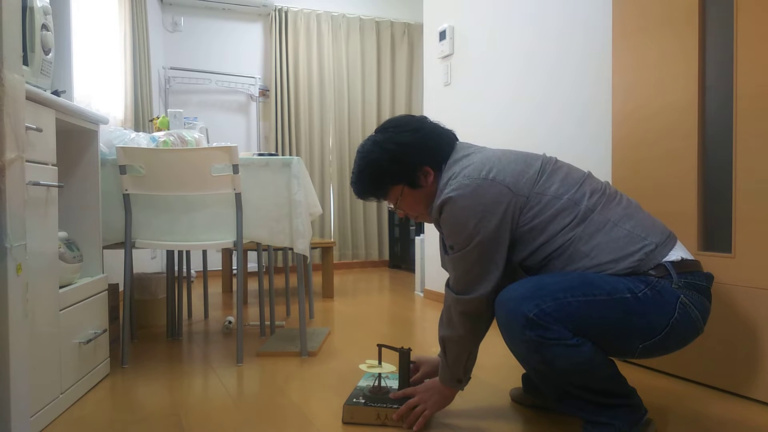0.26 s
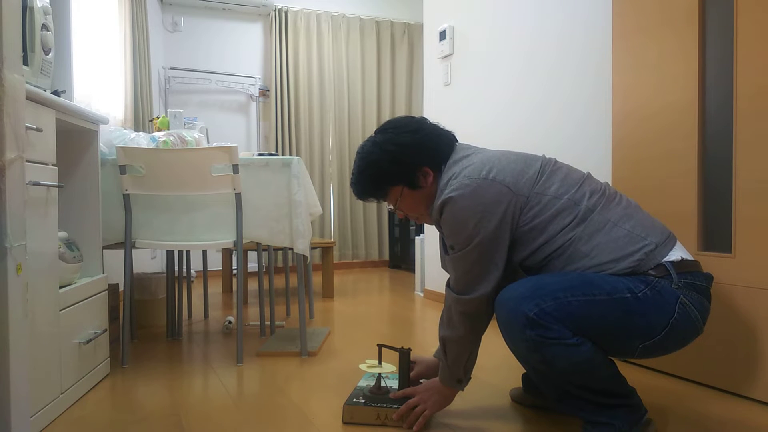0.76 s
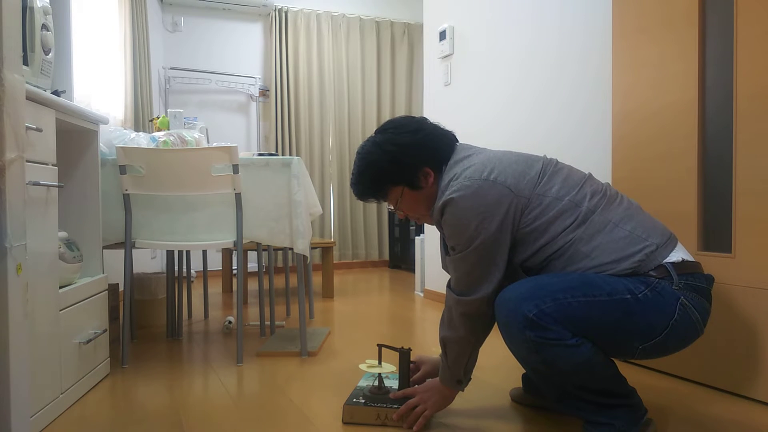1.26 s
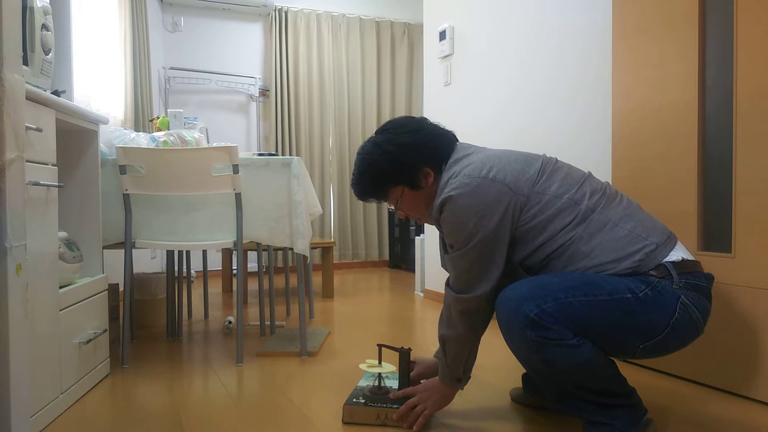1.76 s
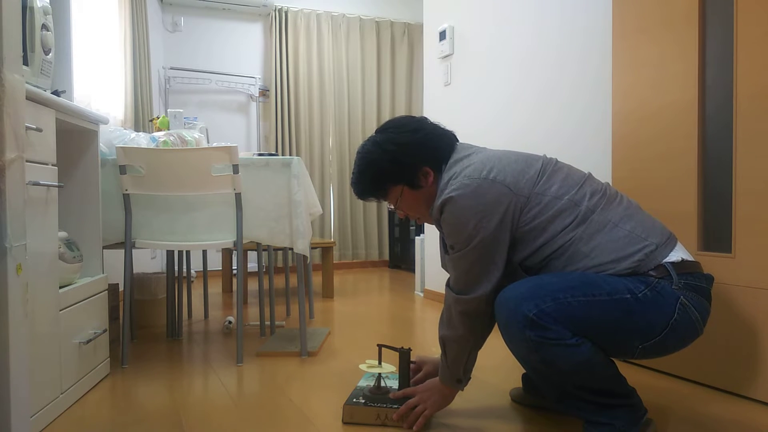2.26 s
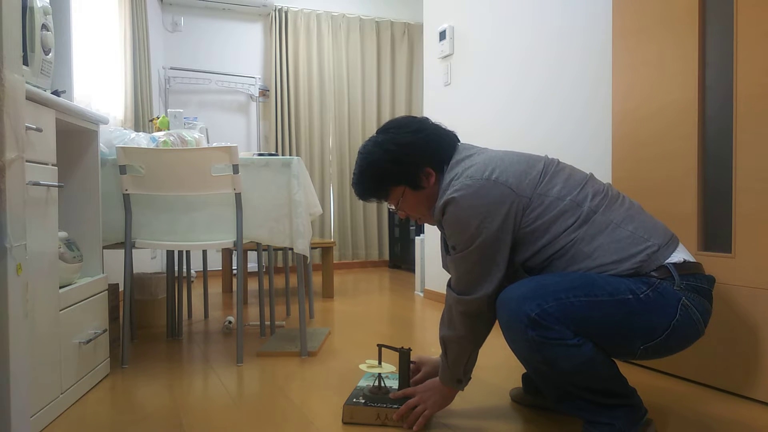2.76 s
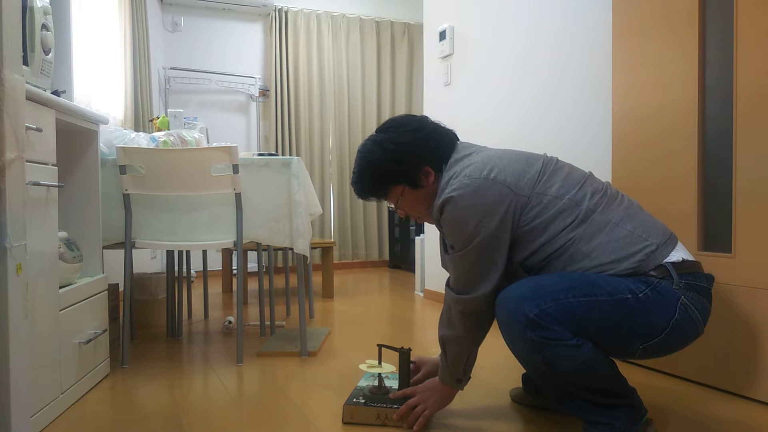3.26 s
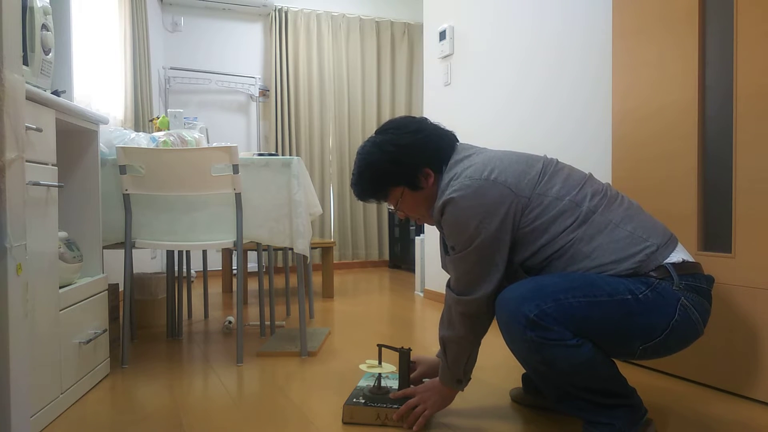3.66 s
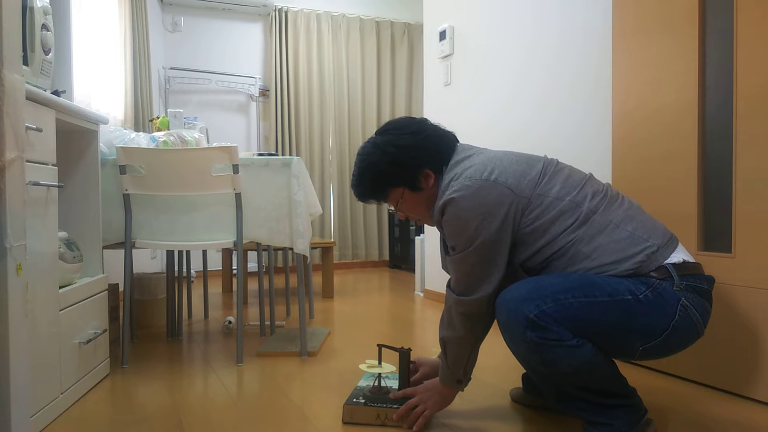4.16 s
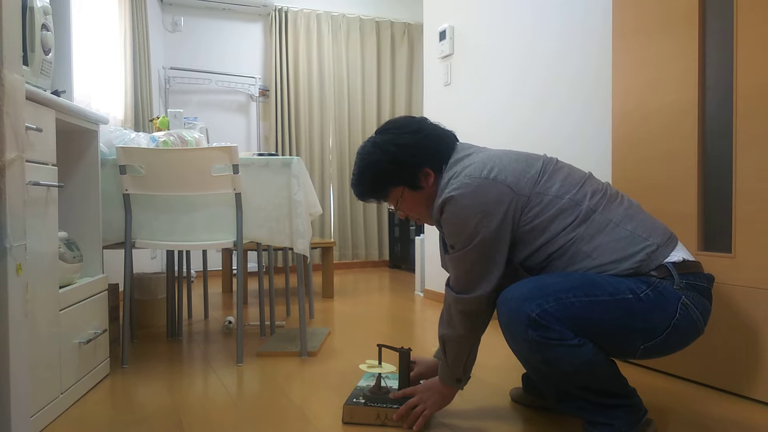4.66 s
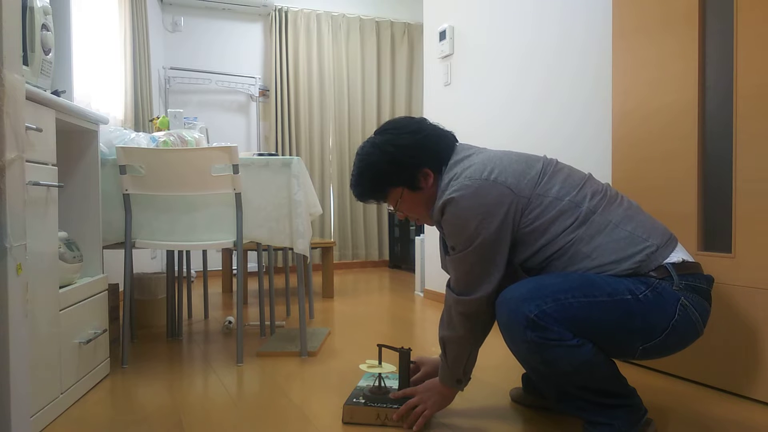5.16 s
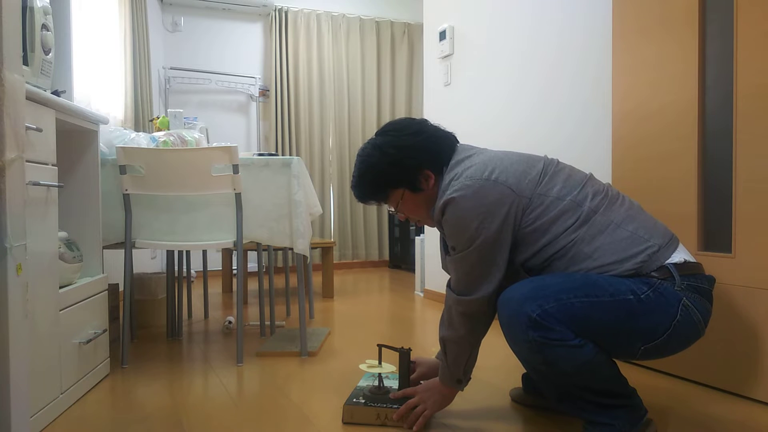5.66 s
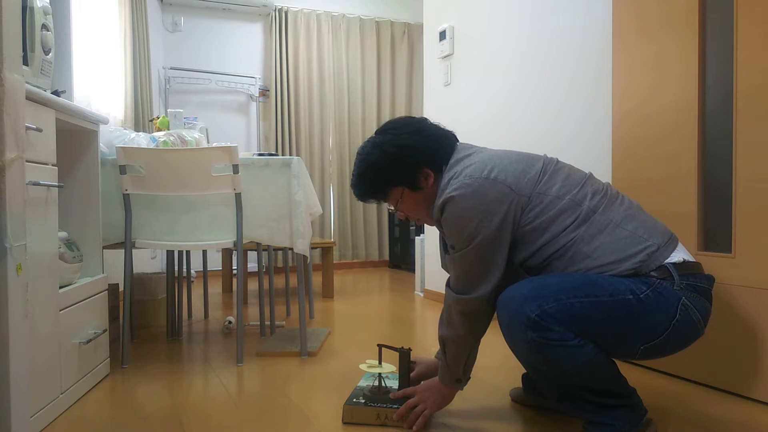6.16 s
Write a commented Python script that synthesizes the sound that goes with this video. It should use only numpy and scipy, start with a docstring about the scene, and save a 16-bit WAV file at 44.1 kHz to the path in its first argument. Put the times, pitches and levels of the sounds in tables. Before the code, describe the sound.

In a small, bare, reflective room, rubber bands are twisted on a toy launcher standing on a wooden floor. From 0 to 0.45 seconds, a scratchy rub, a thin squeak and a rapid run of dry ticks, with small chirps until 0.85. After a short lull, snaps resume at 1.0, quickening into a rattling run with a scratch from 1.27 to 1.55. At about 1.73 a loud, bright zip whirrs and dies within a fifth of a second. A brief quiet follows. From 2.26 to 3.8, short wavering squeaks around a high pitch come often, strongest near 2.9, mixed with rasping and single clicks. Clicks and squeaks grow sparser from 4 to 4.8, with a low rocking bump at 4.1. Snaps cluster from 5.0 to 5.65 with faint squeaks, then a last click at 6.2. Faint room air and hiss continue throughout; the left is brighter, the right duller.

```python
"""Crank and rubber bands in a bare room

A toy launcher on a wooden floor is wound by its crank in a small, bare room. Twisting rubber bands rub
and snap over each other, as ticks and slip noise that knock the frame; once they slip in a loud zip.
The crank shaft squeaks in its bearing, a few wavering partials, and the base rumbles on the floor.
Two unlike microphones hear it all, mostly by way of the walls, over the faint air of the room."""
import sys
import numpy as np
from scipy import signal
from scipy.fft import rfft, irfft
from scipy.io import wavfile

SR = 44100
rng = np.random.default_rng(int(sys.argv[2]) if len(sys.argv) > 2 else 0)


def output_pcm(signal):
    """Save a mono or channel-first signal as 16-bit PCM at the path in sys.argv[1].

    Samples are clipped to [-1, 1] before scaling.
    """
    pcm = np.clip(np.atleast_2d(signal).T, -1, 1) * 32767
    wavfile.write(sys.argv[1], SR, np.round(pcm).astype(np.int16))


N = 283560
T = np.arange(N) / SR  # seconds

# Pushes on the crank, each a squeak of the bearing.
# Each row: start in seconds, length in seconds, pitch in Hz, relative level in dB.
CRANK_PUSHES = [(.07, 0.1516, 1446, -26), (0.485, 0.046, 1683, -34), (0.781, 0.015, 1680, -37.5),
                (.803, 0.032, 1660, -30), (2.264, 0.055, 1430, -32), (2.459, 0.087, 1488, -31),
                (2.599, .046, 1557, -28), (2.705, 0.067, 1571, -24), (2.771, 0.058, 1393, -29),
                (2.94, 0.063, 1599, -20.5), (2.985, 0.022, 1204, -46), (3.076, 0.092, 1591, -26),
                (3.245, .02, 1610, -29.5), (3.331, 0.022, 1599, -22), (3.47, 0.077, 1654, -29.5),
                (3.547, 0.049, 1621, -28.5), (3.752, 0.067, 1617, -27.5), (4.009, 0.078, 1655, -49),
                (4.211, 0.064, 1612, -28.5), (4.445, .027, 1677, -41), (4.736, 0.048, 1621, -26),
                (5.142, 0.07, 1634, -37), (5.243, 0.037, 1588, -31.5), (5.695, 0.034, 1678, -30),
                (5.845, 0.064, 1655, -37.5), (6.303, 0.0059, 1690, -31)]


def undb(db):
    """Turn decibels into an amplitude factor."""
    return 10 ** (np.asarray(db) / 20)


def on_log_axis(points, hz):
    """Join (Hz, value) points by straight lines over log frequency."""
    f, value = np.transpose(points)
    return np.interp(np.log(hz + 1), np.log(f), value)


def colour(x, points, modes=(), size=2048):
    """Causal minimum-phase filter: a smooth (Hz, dB) outline with resonant (Hz, width Hz, lift dB) peaks."""
    hz = np.arange(size // 2 + 1) * SR / size
    peaks = sum(lift / (1 + (2 * (hz - f) / width) ** 2) for f, width, lift in modes)
    db = on_log_axis(points, hz) + peaks
    # folding the cepstrum forward in time puts all of the response after the blow
    cepstrum = irfft(np.log(undb(db)))
    cepstrum[1:size // 2] *= 2
    cepstrum[size // 2 + 1:] = 0
    response = irfft(np.exp(rfft(cepstrum)))
    return signal.fftconvolve(x, response)[:N]


def cut(x, hz, kind, order=2):
    """Low-, high- or band-pass."""
    return signal.sosfilt(signal.butter(order, hz, kind, fs=SR, output="sos"), x)


def wander(hz):
    """Smooth chance of spread 1, mostly slower than hz."""
    x = cut(rng.standard_normal(N), hz, "low")
    return x / x.std()


def stroke(start, length, edge):
    """A push that swells and lets go; edge is the share of its length spent on each."""
    u = (T - start) / length
    return np.clip(np.minimum(u, 1 - u) / edge, 0, 1)


def slips(rate, spread_db):
    """Tiny slips of uneven size at chance moments, rate per second, rms 1."""
    moments = rng.random(N) < rate / SR
    signs = rng.choice([-1, 1], N)
    sizes = undb(spread_db * np.minimum(rng.exponential(size=N), 3))
    x = moments * signs * sizes
    return x / x.std()


def force(x, knock, top, knock_hz=720, top_hz=5200):
    """Join the low push on the frame, the middle and the sharp top of a contact, each weighed apart."""
    low, high = cut(knock, knock_hz, "low"), cut(top, top_hz, "high")
    return cut(x, [knock_hz, top_hz], "band") - low - high


def diffuse(size, alike=0.85, rumble_hz=32, ports_m=0.16):
    """Noise spectra from all sides at two spaced ports: alike in the bass, not in treble or deepest rumble."""
    hz = np.arange(size // 2 + 1) * SR / size
    sound_m_per_s = 343
    likeness = min(alike, 1) * np.sinc(hz * ports_m / (sound_m_per_s / 2))
    likeness = likeness * (1 - np.exp(-(hz / rumble_hz) ** 2))
    mid, side = rfft(rng.standard_normal((2, size)))
    shared = mid * np.sqrt((1 + likeness) / 2)
    opposed = side * np.sqrt((1 - likeness) / 2)
    return hz, shared + np.array([[1], [-1]]) * opposed


def hush(db=-57.5):
    """Faint steady air of the room: coloured noise from all sides."""
    # Outline of the air. Each row: frequency in Hz, relative level in dB.
    air_outline = [(20, -5), (50, 7.5), (85, 8.5), (180, 6), (400, 6.5), (1000, 2.5), (3000, -0.5),
                   (5700, -2), (8500, -11.5), (12000, -13), (13500, -31.5)]
    air = irfft(diffuse(N)[1], N)
    return undb(db) * np.array([colour(ear, air_outline) for ear in air])


def load(hz, free_hz=1710.3, full_load_drop_hz=309):
    """Load on the crank, up to 1: it drags the squeak below its free pitch."""
    return np.clip((free_hz - hz) / full_load_drop_hz, .02, 1)


def effort(edge=0.076):
    """Relative force of the hand on the crank over time: strong, loaded pushes count most."""
    return sum(undb(db) * load(hz) * stroke(s, length, edge) for s, length, hz, db in CRANK_PUSHES)


def rubs(top_db=-2, scrape_db=-1, scrape_knock_db=-5):
    """Taut rubber sticks and slips in a fast uneven scratch, in long rubs and under each push on the crank."""
    # Long rubs of band on band. Each row: start in seconds, length in seconds, relative level in dB,
    # knock of the frame in dB against the rub.
    rub_rows = [(0, 0.14, -23, -31), (0.203, 0.16, -36, 1.5), (1.318, .11, -20.5, -14),
                (1.425, 0.082, -37, -10), (2.344, .09, -33.5, -6), (5.406, 0.054, -31.5, -5)]
    grit = slips(rate=330, spread_db=1.5) * undb(2 * wander(49))
    pushes = [(undb(db) * stroke(s, length, edge=0.13), undb(knock)) for s, length, db, knock in rub_rows]
    pushes.append((undb(scrape_db) * effort(), undb(scrape_knock_db)))
    scratch = grit * sum(push for push, _ in pushes)
    knocks = grit * sum(push * knock for push, knock in pushes)
    return force(scratch, knocks, scratch * undb(top_db))


def snaps(rows, scuff_s=0.003, scuff_db=-1, gain_db=25, knock_db=8, top_db=-6, top_per_knock=0.39, size=2048):
    """Each snap is a sharp tick and a few milliseconds of scuffing rubber."""
    # The hollow base's thump under a knock. Each row: frequency in Hz, lift in dB.
    thump_outline = [(50, -3.5), (100, 2), (170, 1.5), (240, -3), (310, 2.5), (400, 2.5), (510, 2.5),
                     (680, 0), (1500, 4.5)]
    out, t = np.zeros((3, N + size)), np.arange(size) / SR
    for (s, db, knock), grit in zip(rows, rng.standard_normal((len(rows), size))):
        scuff = grit * np.exp(-t / scuff_s)
        contact = undb(scuff_db) * scuff / np.linalg.norm(scuff)
        contact[0] += 1  # the tick
        # a band that misses the frame cracks brighter
        shares_db = np.array([[0], [knock + knock_db], [top_db - top_per_knock * knock]])
        i = int(s * SR)
        out[:, i:i + size] += undb(gain_db + db + shares_db) * contact
    body, knock, top = out[:, :N]
    return force(body, colour(knock, thump_outline), top)


def squeaks(jitter=0.187, bend=0.0498, flutter_db=7, sag=0.0705, edge=0.22,
            octave_db=-8.5, octave_load=0.19, third_db=-25, fourth_db=-23):
    """The dry bearing sticks and slips near one pitch; load adds the octave, bends and smears it to a rasp."""
    # One break into the upper register: start in seconds, length in seconds (negative, so it runs
    # backwards and ends at its start), pitch in Hz, relative level in dB, roughness from 0 to 1.
    squeal = (5.5, -0.0038, 3503, -32, .3)
    out, flutter = np.zeros(N), wander(89)
    grip = jitter * wander(706) + bend * wander(45.5)
    loaded_pushes = [(*row, load(row[2])) for row in CRANK_PUSHES]
    for s, length, hz, db, rough in loaded_pushes + [squeal]:
        push = stroke(s, length, edge)
        on = push > 0
        progress = (T[on] - s) / length
        pitch = hz * (1 + rough * (grip[on] - sag * (progress - .5)))
        phase = 2 * np.pi * np.cumsum(pitch) / SR
        octave = undb(octave_db) * min(rough / octave_load, 1)
        partials = [1, octave, undb(third_db), undb(fourth_db)]
        tone = sum(gain * np.sin((k + 1) * phase) for k, gain in enumerate(partials))
        level = undb(db + flutter_db * min(rough, .5) * flutter[on])
        out[on] += level * push[on] * tone
    return out


def rumble(db=-9):
    """The hands shake the base on the floor with each crank push, and now and then it rocks: low noise."""
    # Outline of the rumble. Each row: frequency in Hz, relative level in dB.
    floor_outline = [(30, -26), (60, -12), (95, 3.5), (140, -6), (200, 6.5), (300, -7), (600, -32),
                     (2000, -60)]
    # The base rocks on the floor. Each row: start in seconds, length in seconds, relative level in dB.
    rock_rows = [(3.223, .09, -28), (4.1, 0.093, -24)]
    rocking = sum(undb(level) * stroke(s, length, edge=0.19) for s, length, level in rock_rows)
    push = effort() + rocking
    return undb(db) * colour(rng.standard_normal(N) * push, floor_outline)


def runs(size=16, jitter_s=.002, scatter_db=2.5):
    """Twists ride over each other: rows of snaps at a nearly even rate, each a little off in time and strength."""
    # Each row: start in seconds, length in seconds, snaps per second, mean relative level in dB,
    # mean knock of the frame in dB against the snap.
    run_rows = [(0.09, 0.15, 44.5, -22.5, -27), (0.2488, .145, 31.5, -18.5, -14.5),
                (1.2747, 0.27, 37.5, -18.5, -17.5)]
    rows = []
    for (start, length, rate, db, knock), chance in zip(run_rows, rng.standard_normal((len(run_rows), size, 3))):
        for k, (late, hard, heavy) in enumerate(chance):
            if k / rate < length:
                s = start + k / rate + jitter_s * late
                rows.append((s, db + scatter_db * hard, knock + scatter_db * heavy))
    return rows


def zip_slip(start_s=1.7268, peak_db=-14.5, build_s=0.037, build_db=7.5, run_s=0.16, fade_db_per_s=86,
             stop_db_per_s=179.5, knock_db=-13, top_db=1):
    """The twist runs loose: very dense bright slips build, whirr and run down, with little weight on the frame."""
    age = T - start_s
    build = build_db * np.clip(1 - age / build_s, 0, 1)
    fade = fade_db_per_s * np.maximum(age - build_s, 0)
    stop = stop_db_per_s * np.maximum(age - run_s, 0)  # steepens the fade
    x = slips(rate=2500, spread_db=3.0) * undb(peak_db - build - fade - stop) * (age > 0)
    outline = [(500, 0.5), (1150, 3.5), (2000, 1.5), (8000, 0.5), (13500, 6)]  # (Hz, dB)
    whirr = (3300, 800, 4)  # (Hz, width Hz, lift dB)
    x = colour(x, outline, [whirr])
    return force(x, x * undb(knock_db), x * undb(top_db))


def room(x, left_db=-8, right_db=-13, early_db=-8, early_s=.032, build_s=0.00013, size=24576, count=10):
    """One spot's way to the microphones: direct path, a few hard reflections, then a tail that changes colour."""
    # Time for the tail to fall by 60 dB. Each row: frequency in Hz, time in seconds.
    decay_times = [(150, 0.59), (400, .36), (1040, 0.26), (2760, 0.33), (7280, 0.24), (14000, 0.26)]
    hz, noise = diffuse(size)
    t, centres = np.arange(size) / SR, np.geomspace(60, 15000, count)
    tail = 0
    for centre, band in zip(centres, np.eye(count)):
        part = irfft(noise * on_log_axis(np.c_[centres, band], hz))
        tail = tail + part * undb(-60 * t / on_log_axis(decay_times, centre))
    tail = tail * (1 - np.exp(-t / build_s))
    response = tail / np.sqrt(np.sum(tail ** 2) / 2)
    response[:, 0] += undb([left_db, right_db])  # direct sound
    for ear in response:
        arrivals = (rng.random(count) * early_s * SR).astype(int)
        ear[arrivals] += undb(early_db) * rng.choice([-1, 1], count) / np.sqrt(count)
    return signal.oaconvolve(x[None], response, axes=1)[:, :N]


def scene(count=3):
    """The bands touch the frame at several spots, and each spot stirs the room in its own way."""
    # Single snaps of a band. Each row: start in seconds, relative level in dB,
    # knock of the frame in dB against the snap.
    snap_rows = [(.002, -17.5, -11.5), (.0278, -18.5, -10.5), (.4075, -16, -15.5), (.4305, -18, -36.5),
                 (1.0009, -17, -11.5), (1.055, -14.5, -9), (1.1203, -15.5, -12.5), (1.1748, -15.5, -13.5),
                 (1.2432, -17.5, -19), (1.48, -14.5, -7.5), (1.6186, -20, -36), (1.7344, -13, -30),
                 (2.381, -26, -21), (2.4059, -17.5, -4.5), (2.4697, -18.5, -34), (2.786, -22.5, -13),
                 (2.8432, -18, -15.5), (2.9188, -22.5, -45), (3.2839, -21, -16), (3.3057, -21, -18.5),
                 (3.4362, -22, -42.5), (3.6815, -17, -7), (3.7151, -14, -14), (3.964, -35.5, 1.5),
                 (4.1046, -18, -10.5), (4.1616, -19, -20.5), (4.2614, -21, -38), (4.9752, -16.5, -7.5),
                 (5.0257, -14.5, -8), (5.1192, -16, -13.5), (5.2882, -20.5, -9.5), (5.3904, -16, -9),
                 (5.4207, -17.5, -7.5), (5.4553, -19.5, -12), (5.5278, -20, -22), (5.6458, -24, -45.5),
                 (6.1982, -18.5, -5.5), (6.3037, -37, -4)]
    # Outline of the frame. Each row: frequency in Hz, relative level in dB.
    frame_outline = [(40, -31), (90, -11), (155, -18), (220, -5), (380, -5.5), (600, 0.5), (950, -5.5),
                     (1400, -2), (2400, -2.5), (4000, -1), (6500, -6), (9000, -14.5), (11300, -14),
                     (14000, -39)]
    # Resonances of the frame. Each row: frequency in Hz, width in Hz, lift in dB.
    frame_modes = [(387.6, 54, 9.5), (1293, 360, 1), (1768, 310, 4.5), (3190, 100, -0.5), (7230, 240, 2),
                   (8120, 177, 5)]
    contacts = [snaps(snap_rows[spot::count]) for spot in range(count)]
    contacts += [rubs(), zip_slip(), snaps(runs(), scuff_s=0.0021, scuff_db=-4, top_db=-5.5)]
    bands = sum(room(colour(x, frame_outline, frame_modes)) for x in contacts)
    # the crank stands clear above the frame, so more of its squeak arrives directly
    crank = room(squeaks() + rumble(), left_db=-3.5, right_db=-10.5)
    return bands + crank + hush()


def record(dry, hiss_db=-76, top_hz=14500):
    """The left port is open and bright; the right one honks near 3.5 kHz and is dull above; both hiss."""
    # Responses of the two microphones. Each row: frequency in Hz, level in dB.
    left_mic = [(100, 2), (1000, -2), (2400, -1.5), (3600, -5), (6000, 2), (14000, 3)]
    right_mic = [(100, 1), (550, -1.5), (1300, -0.5), (2300, -2.5), (2800, 0.5), (3150, 6.5), (4050, 6.5),
                 (4700, -2.5), (6000, -5), (8000, -14.5), (11000, -26), (14000, -10.5)]
    heard = np.array([colour(dry[0], left_mic), colour(dry[1], right_mic)])
    heard = heard + undb(hiss_db) * rng.standard_normal((2, N))
    # steep upper limit
    return signal.sosfilt(signal.ellip(8, .2, 70, top_hz, fs=SR, output="sos"), heard)


dry = scene()
out = record(dry)
output_pcm(out)
```